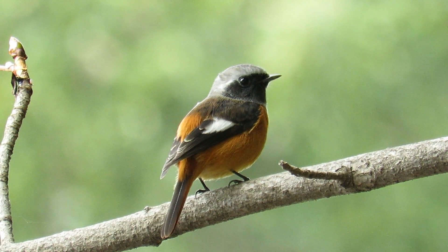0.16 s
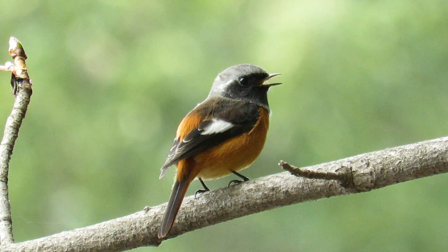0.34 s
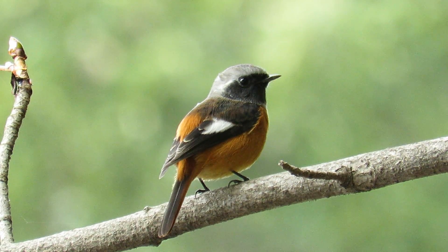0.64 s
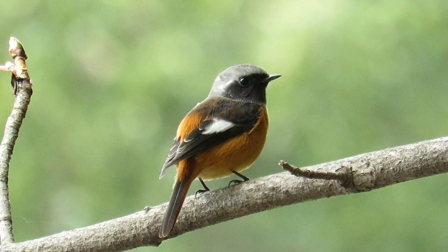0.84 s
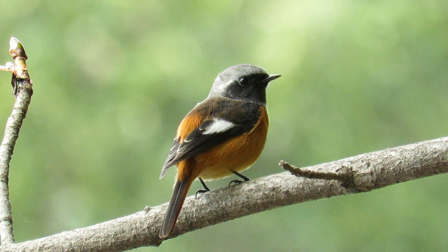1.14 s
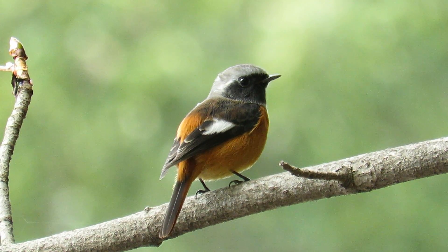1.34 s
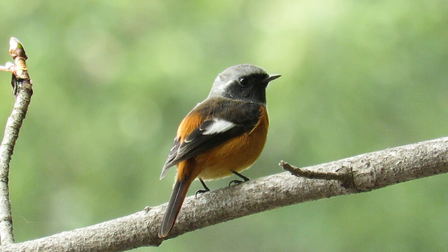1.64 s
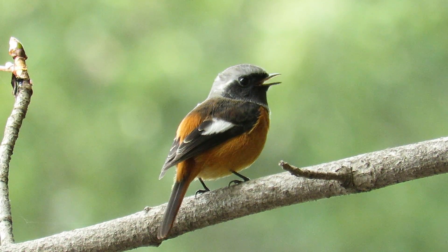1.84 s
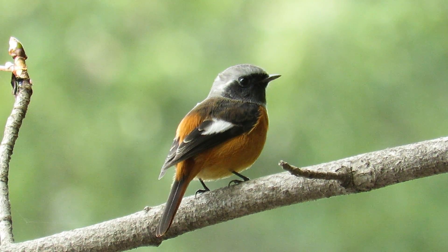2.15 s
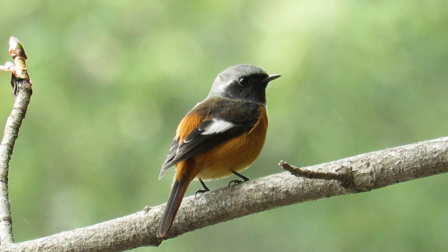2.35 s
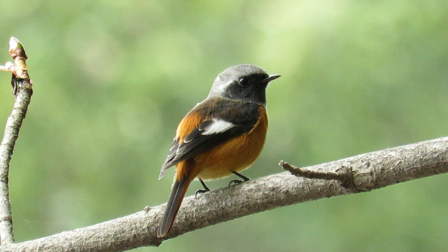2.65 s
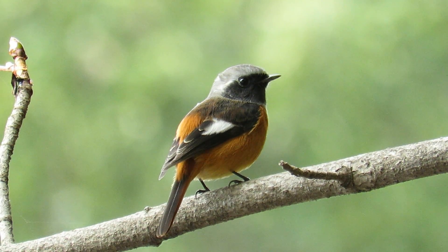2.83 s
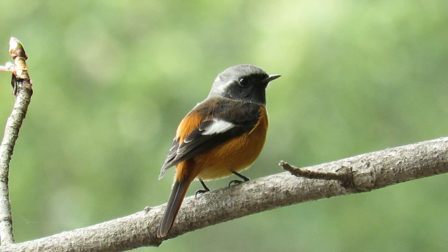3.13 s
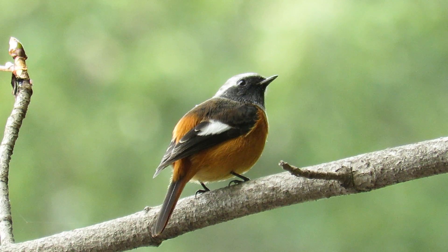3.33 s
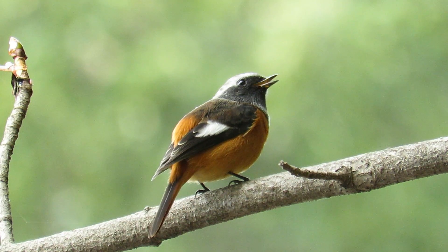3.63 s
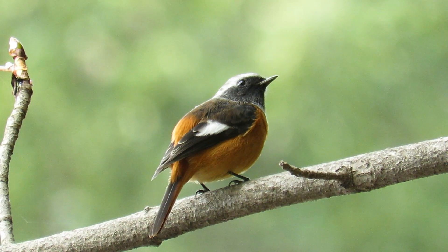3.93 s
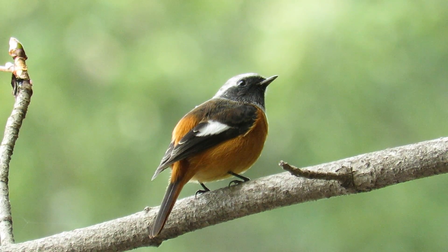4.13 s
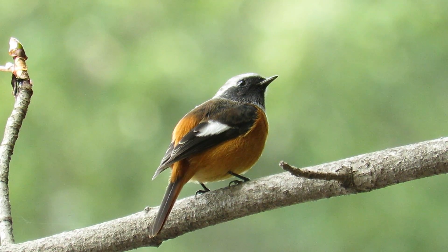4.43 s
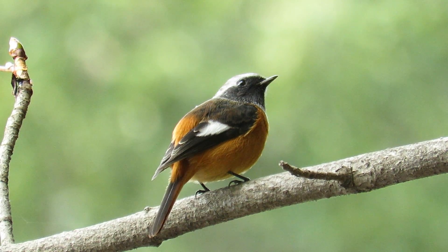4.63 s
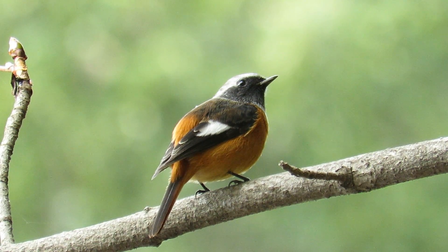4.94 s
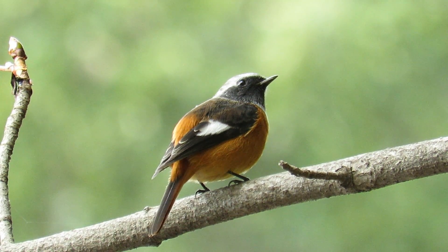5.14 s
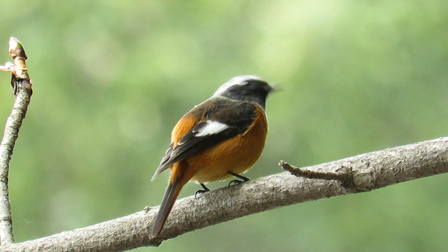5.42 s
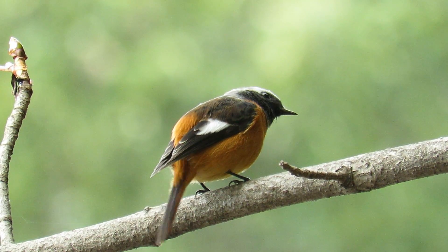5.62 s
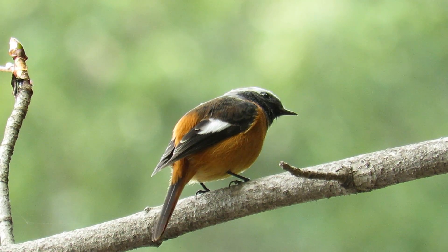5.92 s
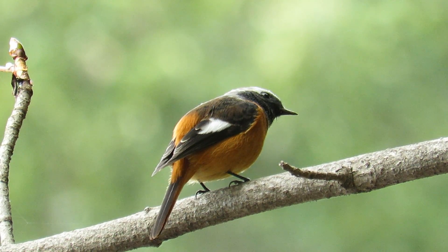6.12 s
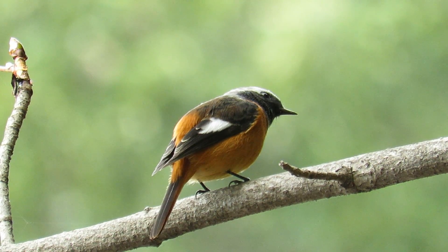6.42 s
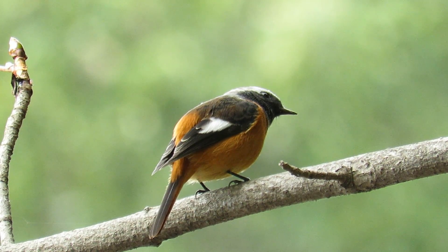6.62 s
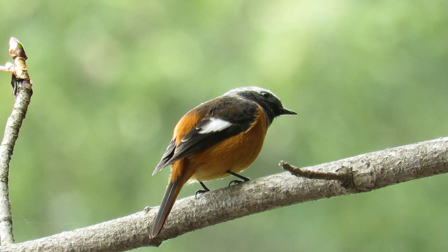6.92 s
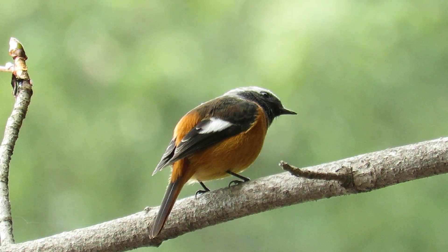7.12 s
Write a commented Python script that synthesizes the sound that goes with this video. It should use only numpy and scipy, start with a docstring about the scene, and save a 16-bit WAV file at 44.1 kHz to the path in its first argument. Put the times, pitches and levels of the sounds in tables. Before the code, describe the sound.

A small bird gives four thin, high, falling whistles among trees, over steady hiss, a low drone and distant twittering.

```python
"""A redstart on a branch, left of a camera, gives four thin falling whistles that ring on among the trees.
Each is a near-pure tone that swells, sags and flicks down; a trunk reflects it, leaves flutter its echo.
Far birds twitter, chirp and trill over steady hiss, a low drone and a few soft tones.
The lens motor purrs once, its steps knocking the camera body. The sound fades at the end, then shuts off."""
import sys
import numpy as np
from scipy import signal
from scipy.fft import rfft, irfft, next_fast_len
from scipy.io import wavfile
from scipy.ndimage import uniform_filter1d, map_coordinates

SR = 44100
rng = np.random.default_rng(int(sys.argv[2]) if len(sys.argv) > 2 else 0)


def digitize_waveform(pressure):
    """Quantize a signal to 16-bit integers and store it at the path in sys.argv[1].

    Rows of a 2-D input are taken as channels; values are limited to [-1, 1].
    """
    field = np.atleast_2d(pressure).T
    bounded = np.clip(field, -1, 1)
    quanta = np.round(bounded * 32767).astype(np.int16)
    wavfile.write(sys.argv[1], SR, quanta)


N = 320607


def amp(db):
    return 10 ** (np.asarray(db) / 20)


def along(points, hz):
    """Interpolate (Hz, value) points on a log axis."""
    knots_hz, values = np.transpose(points)
    return np.interp(np.log(hz + 1), np.log(knots_hz + 1), values)


def filtered(x, response):
    """Apply a complex response(hz)."""
    n = next_fast_len(N + SR // 2)
    return irfft(rfft(x, n) * response(np.fft.rfftfreq(n, 1 / SR)), n)[..., :N]


def wobble(n, rate_hz):
    """Smooth random curve, n samples."""
    knots = rng.standard_normal(int(n * rate_hz / SR) + 4)
    return map_coordinates(knots, [np.arange(n) * rate_hz / SR])


def pan(x, left_db):
    return x * amp([[left_db / 2], [-left_db / 2]])


def add(mix, start_s, sound):
    part = mix[:, round(start_s * SR):][:, :sound.shape[1]]
    part += sound[:, :part.shape[1]]


def echoes(x, far_t60_s, near_t60_s, near_db):
    """Tree scatter: short near tail plus long far tail, uncorrelated left and right."""
    t = np.arange(SR * 3 // 4) / SR
    decay = amp(-60 * (t / far_t60_s) ** 1.56) + amp(near_db - 60 * t / near_t60_s)
    tail = rng.standard_normal((2, len(t))) * decay
    return signal.fftconvolve(np.atleast_2d(x), tail / np.linalg.norm(tail[0]), axes=1)


def slide(length_s, first_hz, last_hz):
    """Hann-windowed sine glide."""
    n = round(length_s * SR)
    return np.hanning(n) * np.sin(2 * np.pi * np.cumsum(np.geomspace(first_hz, last_hz, n)) / SR)


def air():
    """Hiss and a wide low drone in faint patches, the low mids in opposite phase left and right."""
    # spectrum in phase left and right: (frequency [Hz], relative density [dB])
    mid_shape = [(12, -42), (20, -15.5), (93, -4.5), (181, -8.5), (247, -0.5), (345, -7.5), (419, -7),
                 (620, -11), (819, -10), (1180, -13.5), (3910, -16.5), (14500, -20.5), (15800, -22)]
    # spectrum in opposite phase: (frequency [Hz], relative density [dB])
    side_shape = [(12, -58.5), (20, -35), (53, -28), (119, -9), (181, -9), (254, 0.5), (300, -5),
                  (482, -7.5), (554, -10), (843, -13), (2000, -23), (12600, -30), (15800, -29.5)]
    # balance: (frequency [Hz], left-right [dB])
    tilt = [(25, 0), (60, 8), (125, -4), (300, 0), (15000, 0.5)]
    # flicker, deepest in the treble: (frequency [Hz], depth [dB])
    flicker = [(300, 0.4), (5000, 1.34), (12000, 1.5)]
    bins_hz, _, spectra = signal.stft(rng.standard_normal((2, N)), SR, nperseg=512)
    patches = uniform_filter1d(rng.standard_normal(spectra.shape[1:]), size=5, axis=0)
    patches = uniform_filter1d(patches, size=7, axis=1)
    flicker_db = along(flicker, bins_hz)[:, None] * patches / np.std(patches)
    noise = signal.istft(spectra * amp(flicker_db), nperseg=512)[1][:, :N]
    mid, side = filtered(noise, lambda hz: amp([along(mid_shape, hz), along(side_shape, hz)]))
    mid, side = amp(-50.5) * mid / np.std(mid), amp(-45) * side / np.std(side)
    stereo = np.array([mid + side, mid - side])
    return filtered(stereo, lambda hz: amp(along(tilt, hz) * np.array([[.5], [-.5]])))


def twitter():
    """Far flock: dense short notes around one pitch, a few lower, blurred by distance."""
    # loudness contour: (time [s], level [dB])
    contour = [(0, -64), (.2, -56), (.88, -53), (1.37, -64.5), (1.51, -58), (1.74, -69.5), (2.26, -61),
               (2.67, -72.5), (3.04, -56.5), (3.1, -63), (3.32, -60.5), (3.4, -52.5), (3.54, -57),
               (3.72, -54.5), (4.44, -61.5), (5.82, -65), (5.89, -60), (6.05, -64)]
    count, pitch_hz = 1500, 4039
    notes = np.zeros((1, N))
    for start_s in rng.uniform(0, 6.5, count):
        bend, spread, size, stray = rng.standard_normal(4)
        hz = pitch_hz * (1 + .015 * spread - .13 * max(stray - .8, 0))
        note = slide(.013, hz * (1 + .013 * bend), hz * (1 - .019 * bend))
        add(notes, start_s, amp(2.3 * size) * note[None])
    flock = .24 * notes + echoes(notes, far_t60_s=.37, near_t60_s=.12, near_db=-1)[:, :N]
    level_db = np.interp(np.arange(N) / SR, *np.transpose(contour))
    return pan(flock / np.std(flock) * amp(level_db), -1.5)


def chirps():
    """Single far glides on the right, more echo than direct sound."""
    # calls: (start [s], length [s], first pitch [Hz], last pitch [Hz], relative level [dB])
    calls = [(0, 0.016, 3020, 2520, -52), (.045, 0.057, 2540, 2044, -56), (0.296, 0.048, 2200, 3400, -53),
             (0.376, .065, 2650, 2070, -57.5), (3.255, 0.026, 2700, 2850, -64),
             (3.317, 0.072, 2655, 2206, -56.5), (3.398, .06, 2300, 1920, -58),
             (4.232, .03, 2940, 2650, -61), (4.298, 0.067, 2360, 2250, -60), (5.34, .05, 3000, 2536, -61)]
    direct = np.zeros((2, N))
    for start_s, length_s, first_hz, last_hz, db in calls:
        add(direct, start_s, pan(amp(db) * slide(length_s, first_hz, last_hz), -5))
    return .6 * direct + amp(3) * echoes(direct, far_t60_s=.2, near_t60_s=.04, near_db=4)[:, :N]


def redstart():
    """Near-pure whistles; the closing pitch drop beats against the echo of the held note."""
    # whistles: (start [s], hold [s], level [dB], pitch [Hz], sag [Hz/s], swell [s], fade [dB/s],
    #   closing accent [dB], throb [0-1], left-right [dB], octave [dB], echo [dB], trunk reflection [dB])
    whistles = [(.553, .105, -21, 4886, 200, 0.027, 10, 0, 0.1, 6.5, -50, -18.5, -13),
                (2.088, .106, -26, 4895, 151, .014, 10, 5, .1, 5.5, -43.5, -15.5, -11),
                (3.8, .109, -26, 4878, 400, .02, 65, -0.5, .65, 5, -27, -14.5, -12),
                (5.485, 0.1084, -24, 4890, 650, .02, 140.5, 10.5, .6, 3, -23, -12.5, -14)]
    scoop_hz, scoop_s, drop_hz_per_s = 230, .012, 12000  # starts sharp, flicks down at the close
    swell_db, release_db, release_s = 37.5, 13.5, .012
    accent_width_s, accent_lead_s = .009, .004
    throb_hz, dip_delay_s = 56, .0036
    lead_s = np.array([[.000065], [0]])  # left microphone port hears it first
    mix = np.zeros((2, N))
    for (start_s, hold_s, db, hz, sag_hz_per_s, swell_s, fade_db_per_s,
         accent_db, throb_depth, left_db, octave_db, echo_db, trunk_db) in whistles:
        t = np.arange(0, hold_s + .03, 1 / SR)
        closing_s = np.maximum(t - hold_s, 0)
        pitch_hz = hz + scoop_hz * np.exp(-t / scoop_s) - sag_hz_per_s * t - drop_hz_per_s * closing_s
        pitch_hz *= 1 + .002 * wobble(len(t), 203)
        phase = 2 * np.pi * (np.cumsum(pitch_hz) / SR + pitch_hz * lead_s)
        tone = np.sin(phase) + amp(octave_db) * np.sin(2 * phase)
        level_db = db - swell_db * np.exp(-t / swell_s) - fade_db_per_s * t
        level_db += accent_db * np.exp(-((t - hold_s + accent_lead_s) / accent_width_s) ** 2)
        level_db -= release_db * (closing_s / release_s) ** 2
        depth = throb_depth * (t / hold_s) ** 1.6
        throb = 1 - depth * np.cos(2 * np.pi * throb_hz * (t - hold_s - dip_delay_s))
        note = np.sqrt(2) * amp(level_db) * throb * tone
        add(mix, start_s, note * amp([[0], [-left_db]]))
        add(mix, start_s + .02, pan(amp(trunk_db) * note, .88))
        tail = echoes(note[0], far_t60_s=.58, near_t60_s=.054, near_db=0)
        flutter_db = 1.4 * wobble(tail.shape[1], 44.3)  # moving leaves
        add(mix, start_s + .03, amp(echo_db + flutter_db) * tail)
    return mix


def hums():
    """Brief soft gliding tones, low to mid pitch."""
    # tones: (start [s], length [s], first pitch [Hz], last pitch [Hz], peak [dB], left-right [dB])
    tones = [(.82, .14, 295, 290, -50.5, 4), (4.17, 0.27, 480, 375, -56.5, 5.5),
             (.62, .07, 1700, 2000, -59, -3), (5.5, .08, 1850, 1830, -60, -4)]
    mix = np.zeros((2, N))
    for start_s, length_s, first_hz, last_hz, db, left_db in tones:
        add(mix, start_s, pan(amp(db) * slide(length_s, first_hz, last_hz), left_db))
    return mix


def trills():
    """One far bird: buzzy runs of falling notes, each run climbing slightly."""
    # runs: (start [s], length [s], note peak [dB], left-right [dB])
    runs = [(1.32, 0.2, -55, 4), (3.164, 0.17, -54, 3), (4.755, 0.12, -54.5, 3), (6.128, 0.15, -60, 5)]
    note_rate_hz = 63.3
    direct = np.zeros((2, N))
    for start_s, length_s, db, left_db in runs:
        for offset_s in np.arange(0, length_s, 1 / note_rate_hz):
            climb = 1 + .2 * (offset_s - length_s / 2) + .0065 * rng.standard_normal()
            note = amp(db) * slide(.013, 4850 * climb, 4280 * climb)
            add(direct, start_s + offset_s, pan(note, left_db))
    return direct + amp(-.7) * echoes(direct, far_t60_s=.33, near_t60_s=.06, near_db=-1)[:, :N]


def lens_motor():
    """Steady steps knock the camera body, each with a short grind, felt differently by each port."""
    # body modes: (frequency [Hz], bandwidth [Hz], gain [dB])
    modes = [(106.8, 46, 8), (248, 34, 7), (410, 60, -2.5)]
    start_s, step_rate_hz, jitter_s = 3.98, 29.9, .0016
    knock_db, grind_db, grind_t60_s = -2, -27, .1
    force = np.zeros((2, N))
    t = np.arange(SR // 15) / SR
    for k in range(12):
        step = amp(grind_db - 60 * t / grind_t60_s) * rng.standard_normal((2, len(t)))
        step[:, 0] = amp(knock_db + 1.5 * rng.standard_normal(2))
        add(force, start_s + k / step_rate_hz + jitter_s * rng.standard_normal(), step)

    def body(hz):
        ring = 0
        for k, (mode_hz, width_hz, db) in enumerate(modes):
            damping = 1j * hz * width_hz
            ring += (-1) ** k * amp(db) * damping / (mode_hz ** 2 - hz ** 2 + damping)
        channel_phase_rad = np.array([[0], [1.6]])
        bandpass = 1 / (1 + (hz / 600) ** 4) / (1 + (60 / (hz + 1)) ** 4)
        return ring * bandpass * np.exp(1j * channel_phase_rad)

    return pan(filtered(force, body), .98)


def scene():
    return air() + twitter() + chirps() + redstart() + hums() + trills() + lens_motor()


def record(dry):
    """Linear fade, then shut-off to a trace of hiss; band-limited."""
    # fader: (time [s], gain [linear])
    fade = [(5.9, 0.96), (6.589, 0.27), (6.608, 0)]
    floor_db, top_hz = -98, 15790
    gain = np.interp(np.arange(N) / SR, *np.transpose(fade))
    faded = dry * gain + amp(floor_db) * rng.standard_normal((2, N))
    return filtered(faded, lambda hz: hz < top_hz)


dry = scene()
out = record(dry)
digitize_waveform(out)
```